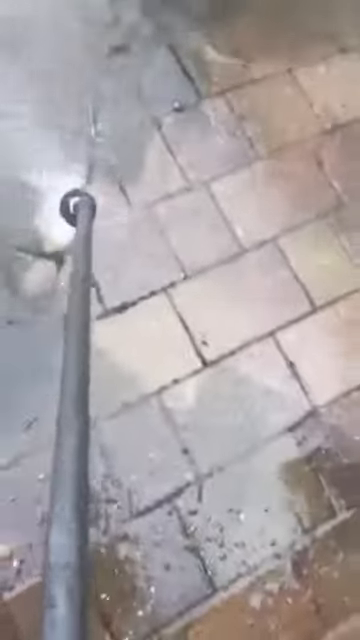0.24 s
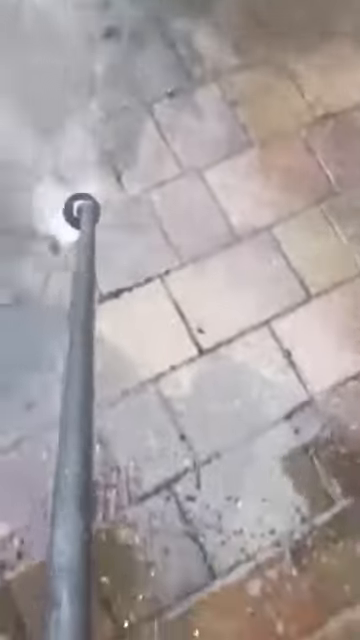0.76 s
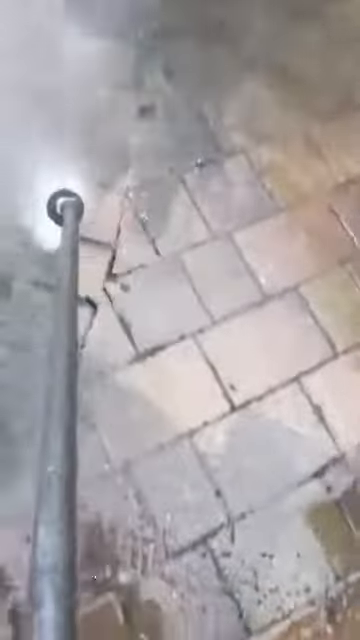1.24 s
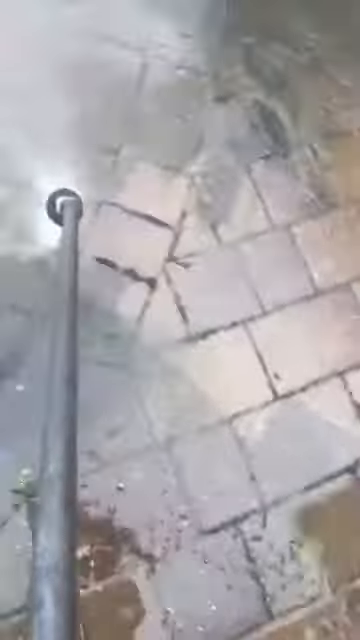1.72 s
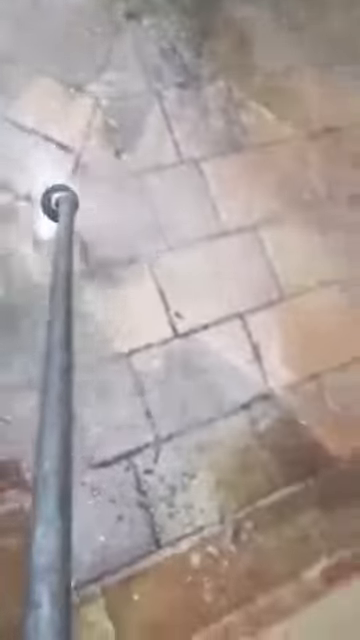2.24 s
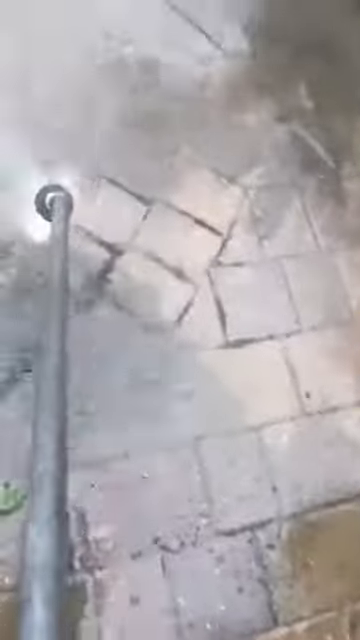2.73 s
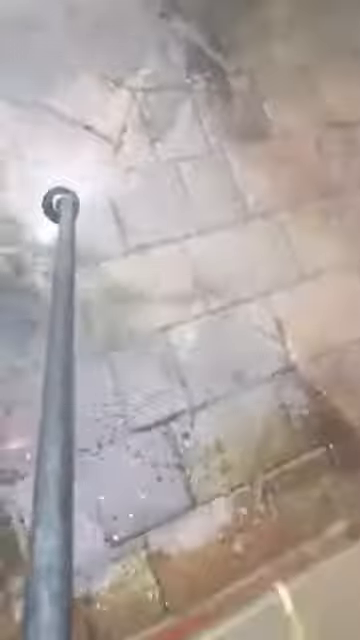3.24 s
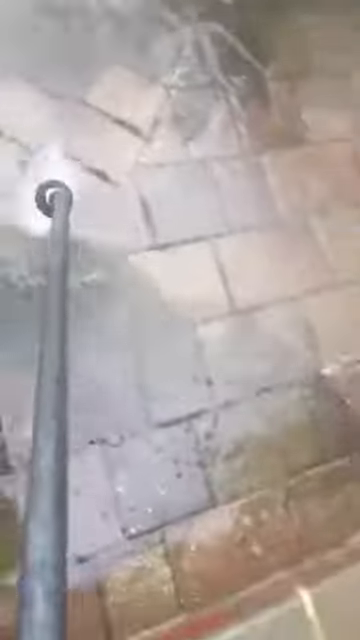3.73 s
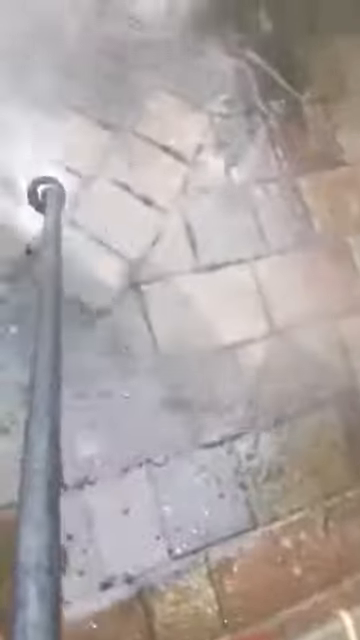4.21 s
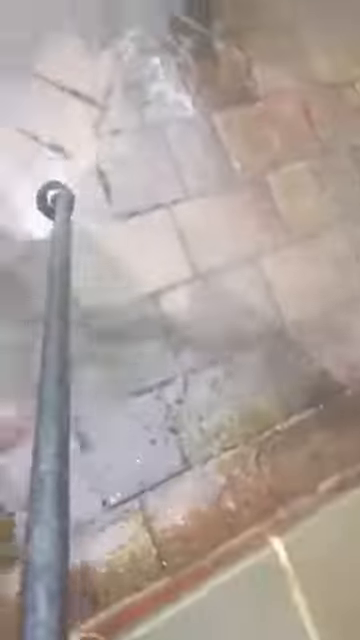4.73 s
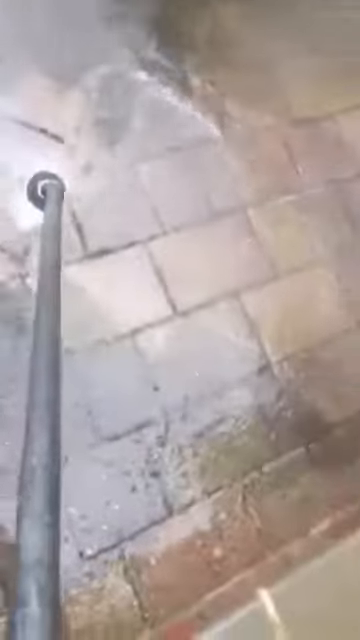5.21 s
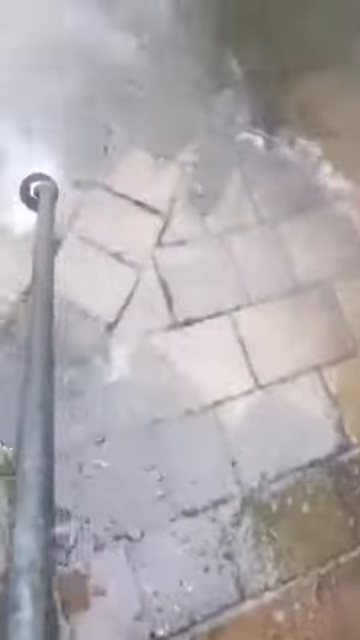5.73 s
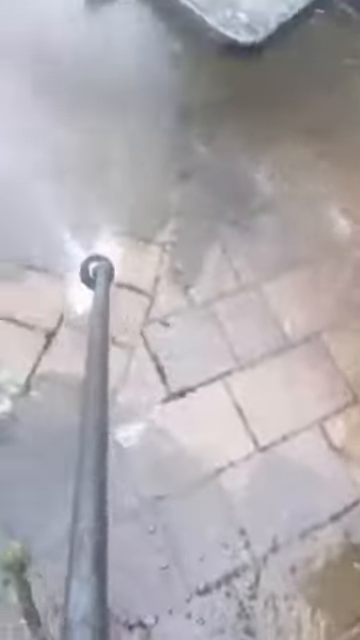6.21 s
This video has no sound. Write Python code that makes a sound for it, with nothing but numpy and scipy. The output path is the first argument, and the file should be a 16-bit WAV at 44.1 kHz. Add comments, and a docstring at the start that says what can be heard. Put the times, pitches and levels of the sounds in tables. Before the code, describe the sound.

Continuous, loud water noise with no pauses: churning midrange rush, sharp hiss of mist and a fine crackle of drops and grit. The hiss swells as the jet bites on stone while the low roar of pooled water thins, then the balance reverses. Irregular short rasps spit from gaps between blocks, more frequent after the first second. It is close, dry and mono, with little bass and slightly rounded peaks.

```python
"""Rushing, hissing water, dotted with drops: a pressure washer sweeps wet block paving, an arm's length away.
Rush, low roar and hiss are noise shaped by level fields; drops are ticks of decaying sine.
One motion drives them: as the jet bites on stone, hiss and mist swell and the roar of pooled water thins.
Each joint between blocks adds a short hollow, spitting rasp (resonant noise), then a slight sag.
At the end the lance swings away: the roar lifts and the main hump of the hiss moves up."""
import sys
import numpy as np
from scipy import signal
from scipy.fft import rfft, irfft
from scipy.io import wavfile
from scipy.ndimage import uniform_filter1d

SR = 44100
rng = np.random.default_rng(int(sys.argv[2]) if len(sys.argv) > 2 else 0)


def dump(signal):
    """Clip the signal to [-1, 1] and save it as 16-bit WAV at the path in sys.argv[1]."""
    limited = np.clip(np.atleast_2d(signal).T, -1, 1)
    pcm = np.round(limited * 32767).astype(np.int16)
    wavfile.write(sys.argv[1], SR, pcm)


N = 284886  # samples

FRAME, HOP = 1024, 256  # samples
FRAME_HZ = np.fft.rfftfreq(FRAME, 1 / SR)
FRAME_S = np.arange(N // HOP + 5) * HOP / SR


def gain_of(db):
    """Converts dB to an amplitude factor."""
    return 10 ** (np.asarray(db) / 20)


def evened(x):
    """Scales to rms 1."""
    return x / np.sqrt(np.mean(x ** 2) + 1e-20)


def read(points, hz):
    """Interpolates (f/Hz, value) points on a log-frequency axis."""
    f, value = np.transpose(points)
    return np.interp(np.log(hz + 1), np.log(f + 1), value)


def add(mix, start_s, sound):
    """Mixes a sound in from start_s."""
    part = mix[max(round(start_s * SR), 0):][:len(sound)]
    part += sound[:len(part)]


def wander(shape, size):
    """Smoothed noise of rms 1: a moving average over size steps along each axis."""
    z = rng.standard_normal(shape)
    for axis, steps in enumerate(size):
        z = uniform_filter1d(z, steps, axis)
    return evened(z)


def turbulence(field_db, patchy_db, flutter_db, streak_db=1.32):
    """Noise of rms 1 shaped by a time-frequency level field, with patches, narrow streaks and wideband flutter."""
    shape = field_db.shape
    # sizes: frames, frequency bins
    patches_db = patchy_db * wander(shape, size=(8, 14))
    flutters_db = flutter_db * wander(shape, size=(4, 160))
    streaks_db = streak_db * wander(shape, size=(12, 3))
    level_db = field_db + patches_db + flutters_db + streaks_db
    noise = rng.standard_normal(shape) + 1j * rng.standard_normal(shape)
    spectrogram = noise * gain_of(level_db)
    sound = signal.istft(spectrogram.T, nperseg=FRAME, noverlap=FRAME - HOP)[1]
    return evened(sound[:N])


# bite of the jet on the stone, as the level of its fine mist: (t/s, level/dB)
BITE_CURVE = [(0.0, -22.5), (0.29, -21), (0.45, -24.5), (0.86, -19), (1.13, -26.5), (1.33, -22),
              (1.6, -24.5), (1.94, -23.5), (1.96, -21.5), (2.14, -22), (2.18, -20.5), (2.39, -21),
              (2.52, -26), (2.86, -24), (3.52, -23), (3.96, -19.5), (4.21, -26), (4.39, -21), (4.7, -21.5),
              (4.91, -25.5), (5.38, -21), (5.67, -25), (5.99, -24), (6.46, -28)]
USUAL_BITE_DB = -23.5


def bite():
    """How much harder than usual the jet bites, in dB, one value a frame."""
    s, db = np.transpose(BITE_CURVE)
    return np.interp(FRAME_S, s, db)[:, None] - USUAL_BITE_DB


# relative spectrum of churning water and roar, per Hz: (f/Hz, level/dB)
RUSH_SPECTRUM = [(25, -55), (65, -53), (100, -47), (150, -16.5), (230, -12.5), (400, -1.5), (700, -1),
                 (1060, -1.5), (1650, -1), (2030, -1.6), (2800, -3), (3600, -5), (6000, -13.5)]
RUSH_RMS_DB = -19
RUSH_DB_PER_BITE_DB, ROAR_DB_PER_BITE_DB = 0.11, -0.82
ROAR_LIFT_DB, SWING_ROAR_LIFT_DB = 0.5, 1.5


def rush(surge_db=0.18):
    """Water churns on the stone in small surges, over a low roar of pooled water that thins when the jet bites."""
    roar_share = read([(380, 0.92), (600, 0.022)], FRAME_HZ)
    surges_db = surge_db * wander((len(FRAME_S), 1), size=(20,))
    rush_db = RUSH_DB_PER_BITE_DB * bite() + lull() + surges_db
    roar_db = ROAR_LIFT_DB + ROAR_DB_PER_BITE_DB * bite() + SWING_ROAR_LIFT_DB * swing()
    field_db = read(RUSH_SPECTRUM, FRAME_HZ) + (1 - roar_share) * rush_db + roar_share * roar_db
    return gain_of(RUSH_RMS_DB) * turbulence(field_db, patchy_db=0.8, flutter_db=0.23)


# relative spectrum of the jet tearing into mist, per Hz: (f/Hz, level/dB)
HISS_SPECTRUM = [(200, -70), (1520, -68), (3550, -9.5), (4560, -1), (5370, 0), (6080, 0), (7090, -5.5),
                 (7800, -5.5), (9150, -4), (10500, -6.5), (12000, -10), (13700, -10.5), (15300, -19)]
HISS_RMS_DB = -19.5
HISS_DB_PER_BITE_DB, MIST_DB_PER_BITE_DB, TOP_DB_PER_BITE_DB = 0.47, 0.84, 1.6
SWING_RISE = 0.13  # upward shift of the main hump, as a share of its frequency


def hiss():
    """The jet shatters on the paving; the finest mist makes the top of the hiss, which swells and fades most."""
    bite_slopes = [(5500, HISS_DB_PER_BITE_DB), (8500, MIST_DB_PER_BITE_DB), (14000, TOP_DB_PER_BITE_DB)]
    db_per_bite_db = read(bite_slopes, FRAME_HZ)
    hump_share = read([(7500, 1), (11000, 0)], FRAME_HZ)
    stretch = 1 + SWING_RISE * swing() * hump_share
    field_db = read(HISS_SPECTRUM, FRAME_HZ / stretch) + db_per_bite_db * bite() + lull()
    return gain_of(HISS_RMS_DB) * turbulence(field_db, patchy_db=1.0, flutter_db=0.65)


DROPS_RMS_DB, DROPS_PER_S = -40, 260  # rate is the mean over all pitches together


def spatter(pitches=36, spread_db=2.0, decay_cycles=5.3):
    """Drops and grit land at random: decaying sine ticks of a few cycles, many small and a few large."""
    t = np.arange(512) / SR
    out = np.zeros(N)
    for hz in np.geomspace(1000, 11000, pitches):
        lands = np.flatnonzero(rng.random(N) < DROPS_PER_S / pitches / SR)
        sizes_db = spread_db * np.minimum(rng.exponential(1, len(lands)), 4)
        clicks = np.zeros(N)
        clicks[lands] = gain_of(sizes_db)
        tick = np.sin(2 * np.pi * hz * t) * np.exp(-hz * t / decay_cycles)
        out += signal.oaconvolve(clicks, tick)[:N]
    return gain_of(DROPS_RMS_DB) * evened(out)


# relative spectrum of water thrown back out of a joint: (f/Hz, level/dB)
SPLASH_SPECTRUM = [(30, -60), (100, -44), (260, -20), (450, -8), (1200, -1.5), (2600, -1), (3600, -0.5),
                   (5200, 2.5), (7200, -8.5), (10000, -11.5), (15000, -30)]
# the jet crosses a joint:
# (middle t/s, nominal length/s, hollow f/Hz, hollow level/dB, splash level/dB, splash tilt/dB per octave)
JOINT_CROSSINGS = [ (0.713, .046, 2000, -33, -16, 3), (0.751, 0.055, 1300, -20.5, -21, 3),
                   (0.948, 0.055, 1650, -18.5, -23, -6), (1.307, 0.072, 1200, -28, -24, 3),
                   (1.459, .16, 1880, -23.5, -34, -2), (1.656, 0.024, 900, -29, -19, 5),
                   (1.961, 0.031, 900, -25, -18.5, 6), (2.195, 0.074, 1300, -26, -19, 6),
                   (2.249, 0.043, 1900, -22, -17, 4), (2.458, 0.027, 900, -24, -16, 3),
                   (2.691, 0.047, 3400, -30, -20, -2), (2.927, 0.034, 2900, -20, -19, 9),
                   (3.363, 0.029, 1920, -20.5, -20.5, -3), (3.637, 0.045, 2800, -35, -17, -1),
                   (3.941, 0.031, 2000, -33, -21, 6), (4.111, 0.026, 1050, -23, -13, -1.5),
                   (4.317, 0.033, 1450, -21, -13.5, -0.5), (4.482, 0.062, 4000, -22, -23, 8),
                   (4.682, 0.052, 1600, -25, -19, 2), (4.903, 0.033, 1400, -27, -16, -4.5),
                   (4.940, 0.1, 1620, -17, -17, -2.5), (5.27, 0.077, 1500, -33, -22, 0),
                   (5.569, 0.037, 1310, -16, -28, -2), (5.913, 0.037, 2180, -16.5, -25, 7)]


def joint(middle_s, length_s, hollow_hz, hollow_db, splash_db, tilt_db_per_oct, sharpness=1.2, spit_db=1.1):
    """The gap between two blocks rings broadly under the jet and spits water back in uneven gulps."""
    count = int(length_s * 1.5 * SR)  # leaves room for the taper
    hz = np.fft.rfftfreq(count, 1 / SR) + 1  # clear of zero
    blast, spray = rfft(rng.standard_normal((2, count))) * gain_of(read(SPLASH_SPECTRUM, hz))
    detuning = hz / hollow_hz - hollow_hz / hz
    hollow = irfft(blast / (1 + 1j * sharpness * detuning) ** 2, count)  # two equal resonances in series
    splash = irfft(spray * gain_of(tilt_db_per_oct * np.log2(hz + 300)), count)
    rasp = gain_of(hollow_db) * evened(hollow) + gain_of(splash_db) * evened(splash)
    gulps = evened(gain_of(spit_db * wander(count, size=(90,))))
    start_s = middle_s - count / SR / 2
    return start_s, rasp * gulps * signal.windows.tukey(count, 0.9)


LULL_AFTER_S, LULL_HALF_WIDTH_S = 0.063, 0.049
LULL_DB_PER_RMS = -3  # per unit rms of the rasp before its taper


def lull():
    """The jet skips past each joint: a brief sag in dB, deeper after a strong rasp, one value a frame."""
    middle_s, length_s, _, hollow_db, splash_db, _ = np.transpose(JOINT_CROSSINGS)
    since_s = FRAME_S[:, None] - (middle_s + length_s / 2 + LULL_AFTER_S)
    rasp_rms = np.hypot(gain_of(hollow_db), gain_of(splash_db))
    sags = rasp_rms * np.exp(-(since_s / LULL_HALF_WIDTH_S) ** 2)
    return LULL_DB_PER_RMS * sags.max(1, keepdims=True)


SWING_AT_S, SWING_LENGTH_S = 5.88, 0.26


def swing():
    """How far the lance has swung away, 0-1, one value a frame."""
    return np.clip((FRAME_S[:, None] - SWING_AT_S) / SWING_LENGTH_S, 0, 1)


def scene():
    """Everything comes from one spot ahead, the same in both channels."""
    water = rush() + hiss() + spatter()
    for crossing in JOINT_CROSSINGS:
        add(water, *joint(*crossing))
    return np.array([water, water])


# narrow peaks and dips of the microphone: (f/Hz, width/Hz, level/dB)
MIC_COLOUR = [(1065, 86, -1.7), (1260, 83, 0.3), (1406, 72, -1.5), (2034, 80, 2), (2290, 60, -0.5),
              (2350, 55, 2.5), (3560, 330, -1.45)]
LOW_CUT_HZ, BAND_LIMIT_HZ = 113, 15420
CEILING = 0.93  # amplitude that the rounding approaches


def record(dry):
    """A small microphone: uneven midrange, thin bass, the highest peaks rounded off, and a band limit."""
    hz = np.fft.rfftfreq(N, 1 / SR)
    colour_db = sum(db * np.exp(-((hz - centre) / width) ** 2) for centre, width, db in MIC_COLOUR)
    coloured = irfft(rfft(dry) * gain_of(colour_db), N)
    low_cut = signal.butter(2, LOW_CUT_HZ, "highpass", fs=SR, output="sos")
    thin = signal.sosfilt(low_cut, coloured)
    rounded = thin / (1 + (thin / CEILING) ** 12) ** (1 / 12)
    band_limit = signal.firwin(1023, BAND_LIMIT_HZ, window=("kaiser", 9), fs=SR)
    return signal.oaconvolve(rounded, band_limit[None], "same")


dry = scene()
out = record(dry)
dump(out)
```